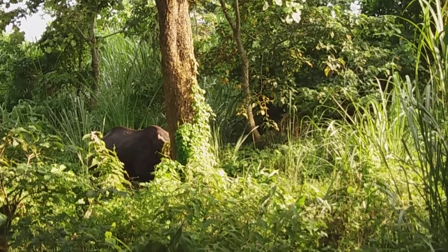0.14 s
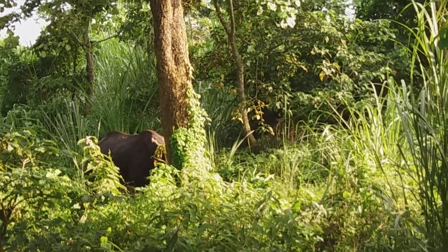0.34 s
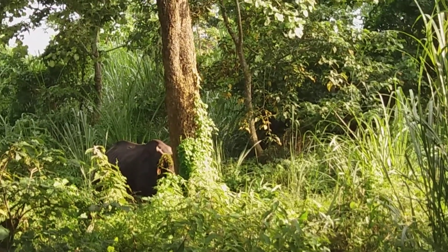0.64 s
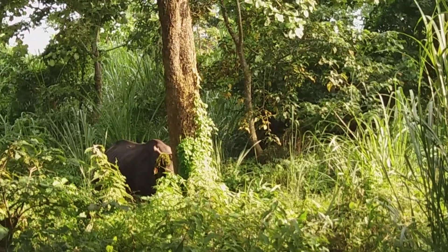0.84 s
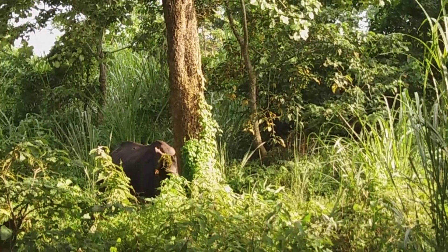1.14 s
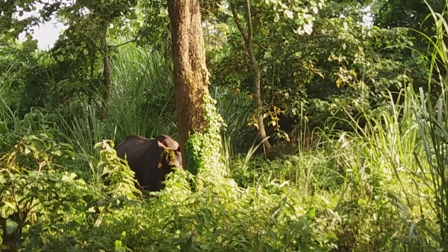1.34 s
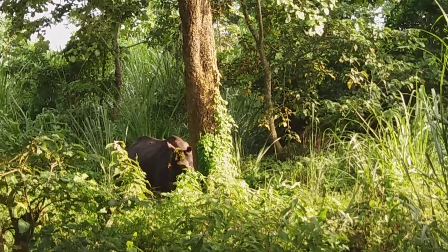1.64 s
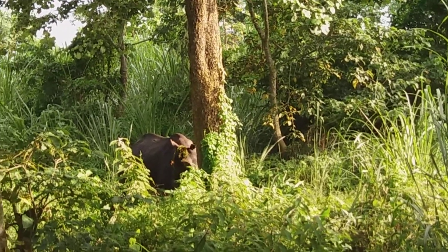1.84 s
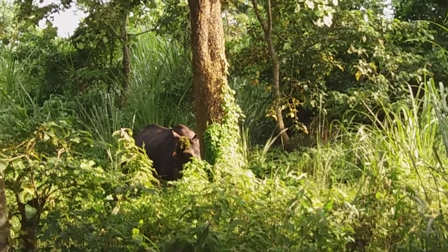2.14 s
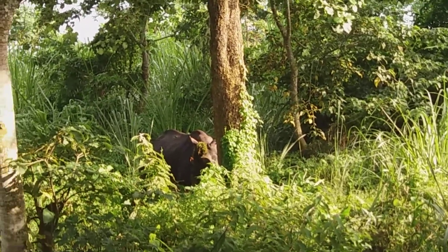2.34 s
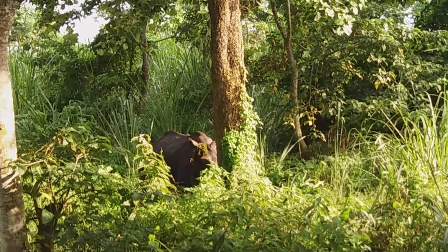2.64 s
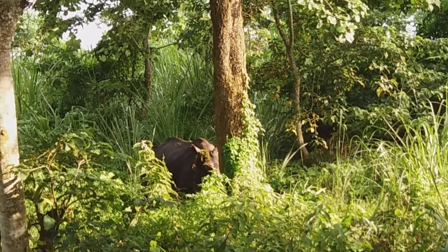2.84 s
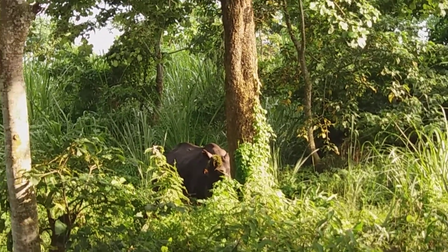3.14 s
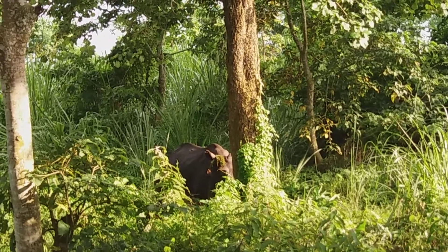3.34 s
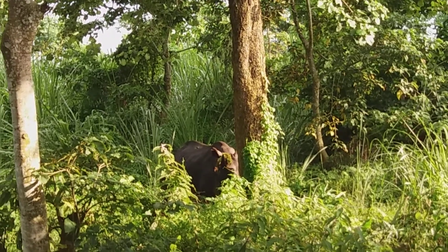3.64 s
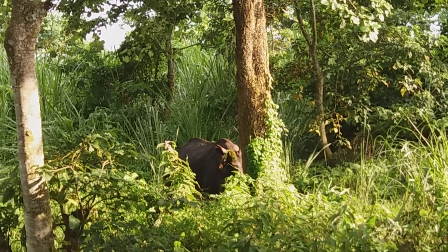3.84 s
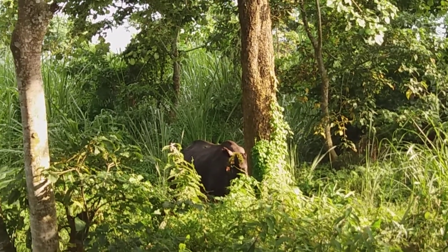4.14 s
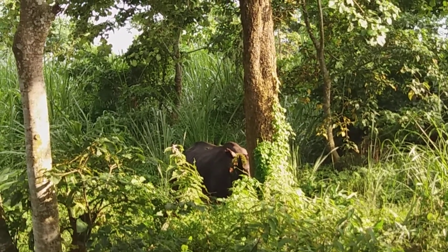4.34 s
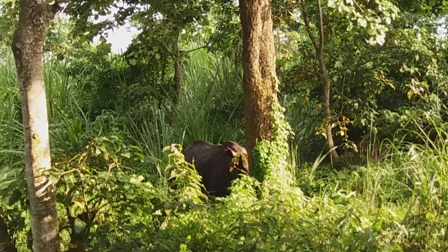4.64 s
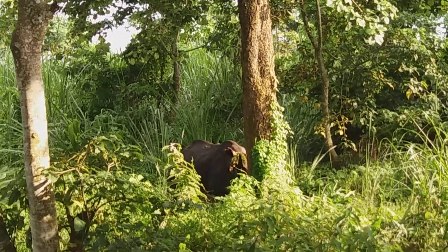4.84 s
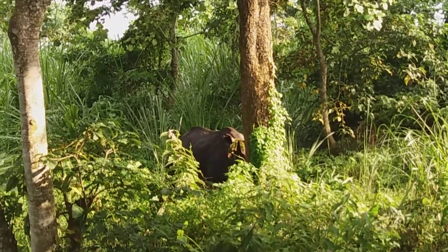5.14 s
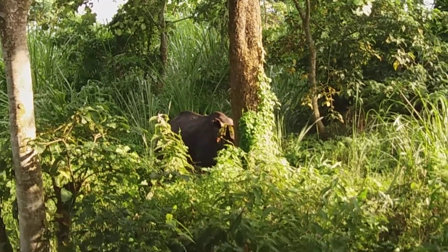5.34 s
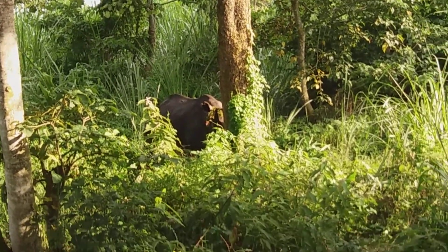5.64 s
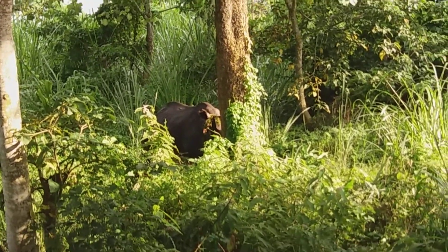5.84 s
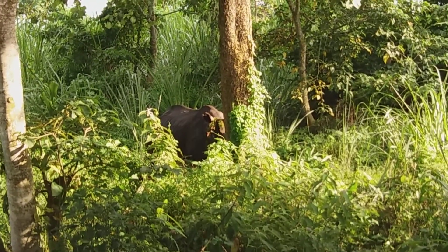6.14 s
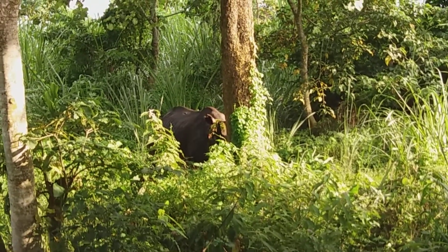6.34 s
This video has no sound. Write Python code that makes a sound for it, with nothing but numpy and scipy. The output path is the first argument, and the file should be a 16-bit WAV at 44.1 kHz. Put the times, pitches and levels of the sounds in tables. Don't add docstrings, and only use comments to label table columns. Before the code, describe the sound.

Dense woodland bird chatter with echoing whoops in threes, steady high insect shimmer, faint leaf hiss and a few dull knocks on the camera.

```python
import sys
import numpy as np
from scipy import signal
from scipy.fft import rfft, irfft
from scipy.io import wavfile
from scipy.ndimage import uniform_filter1d

SR = 44100
rng = np.random.default_rng(int(sys.argv[2]) if len(sys.argv) > 2 else 0)


def master(y):
    cut = np.clip(np.atleast_2d(y).T, -1, 1)
    pcm = np.round(cut * 32767)
    wavfile.write(sys.argv[1], SR, pcm.astype(np.int16))


def attenuation_scalar(level_db):
    decades = np.asarray(level_db, float) / 20
    return 10 ** decades


N = 286209
TIME = np.arange(N) / SR


def unit(x):
    return x / np.sqrt(np.mean(x ** 2) + 1e-30)


def walk(rate, count=N):
    hold = max(int(SR / rate), 1)
    steps = np.repeat(rng.standard_normal(count // hold + 1), hold)[:count]
    return unit(uniform_filter1d(steps, hold))


def curve(points):
    return np.interp(TIME, *np.transpose(points))


def colour(x, shape):
    hz, db = np.transpose(shape)
    f = np.maximum(np.fft.rfftfreq(len(x), 1 / SR), 1)
    gain = attenuation_scalar(np.interp(np.log(f), np.log(hz), db, -200, -200))
    return unit(irfft(rfft(x) * gain, len(x)))


def ring(x, hz, width):
    b, a = signal.iirpeak(hz, hz / width, fs=SR)
    return signal.lfilter(b, a, signal.lfilter(b, a, x))


def clicks(rate, count, jitter, scatter_db):
    chance = rng.standard_normal((int(count * rate / SR * 2) + 4, 2))
    gaps = np.clip(1 + jitter * chance[:, 0], .5, 2) * SR / rate
    at = np.cumsum(gaps).astype(int) - int(SR / rate / 2)
    inside = (at < count) & (at >= 0)
    out = np.zeros(count)
    out[at[inside]] = attenuation_scalar(scatter_db * chance[inside, 1])
    return out


def add(out, s, x):
    i = max(int(s * SR), 0)
    out[i:i + len(x)] += x[:max(N - i, 0)]


def sing(notes, swell, rough, wobble, flutter=150., late=1, sharp=0.27):
    out = np.zeros(N)
    for s, length, a, b, c, db in notes:
        u = np.linspace(0, 1, int(length * SR))
        v = u ** late
        hz = a * (1 - v) * (1 - 2 * v) + 4 * b * v * (1 - v) + c * v * (2 * v - 1)
        hz = hz + np.minimum(hz, 3000) * wobble * walk(flutter, len(u))
        shape = np.sin(np.pi * u ** swell) ** sharp * (1 + rough * walk(flutter, len(u)))
        add(out, s, attenuation_scalar(db) * shape * np.sin(2 * np.pi * np.cumsum(hz) / SR))
    return out


def glides(rows, half):
    return [(s, length, a, a + half * (c - a), c, db) for s, length, a, c, db in rows]


def level(rows):
    return [(s, length, hz, hz, hz, db) for s, length, hz, db in rows]


def burst(length, hz, width, rate, db, edge=0.14):
    count = int(length * SR)
    pulses = clicks(rate, count, .2, 2.2) + 0.04 * rng.standard_normal(count)
    breath = signal.windows.tukey(count, min(edge, 1)) * pulses
    return attenuation_scalar(db) * unit(ring(np.pad(breath, (0, 400)), hz, width))


# pitch in Hz, level in dB.
AIR_SPECTRUM = [(20, -28), (45, 4), (109, -0.5), (474, -13.5), (594, -11.5), (658, -11), (841, -16.5),
                (1590, -13), (2540, -8.5), (3050, -11), (4410, -16.5), (5640, -19), (6000, -29),
                (7800, -31), (13200, -120)]
# pitch in Hz, level in dB.
HISS_SPECTRUM = [(4880, -16), (8300, -30), (8520, -4.5), (9220, 0), (9870, -3.5), (10800, 5), (11200, 0),
                 (11900, -10.5), (13700, -7), (15500, -5.5)]
# time in seconds, level change in dB.
BREEZE_LEVEL = [(0, 0), (3, .5), (4.2, .5), (5.5, -.5), (6.05, -.5), (6.25, -2.5), (6.49, -1)]


def air():
    low = colour(rng.standard_normal(N), AIR_SPECTRUM)
    wind = ring(low, 58, 89)
    low = low + wind * (attenuation_scalar(2.6 * walk(24)) - 1)
    hiss = colour(rng.standard_normal(N), HISS_SPECTRUM)
    low_db = -56 + curve(BREEZE_LEVEL) + 0.49 * walk(5.4)
    return attenuation_scalar(low_db) * low + attenuation_scalar(-63 + 0.19 * walk(5.2)) * hiss


# start in seconds, gap in seconds, rise in dB.
THROB_BOUTS = [(.058, 0.098, 3.5), (.69, 0.11, 2.5), (1.269, .085, 2.5), (1.845, 0.095, 4),
               (2.451, 0.096, 3.5), (3.128, 0.0974, 4.5), (3.742, 0.1, 3.5), (4.345, 0.086, 2.5),
               (5.151, .1, 3), (5.645, 0.088, 4.5), (6.185, .096, 3)]
THROBS_PER_BOUT = [4, 4, 5, 4, 4, 4, 4, 5, 4, 5, 4]
# time in seconds, rise in dB.
STRAY_THROBS = [(2.385, 2.5), (2.855, 0), (2.935, 1.5), (3.048, 2.5), (3.57, 3), (3.64, 2), (4.22, 2),
                (5.8, 2)]


def throbs():
    rows = []
    for (s, gap, db), count in zip(THROB_BOUTS, THROBS_PER_BOUT):
        rows.append(np.linspace((s, db), (s + gap * (count - 1), db), count))
    return np.vstack(rows + [STRAY_THROBS])


# time in seconds, level in dB.
CICADA_LEVEL = [(0, -51.5), (1.0, -48.5), (1.15, -52.5), (1.5, -49), (1.75, -51), (2.6, -50), (4.2, -50),
                (4.6, -47.5), (4.8, -51.5), (5.3, -48), (5.56, -52.5), (6.49, -50.5)]
# pitch in Hz, level in dB.
CICADA_SPECTRUM = [(3290, -73), (5600, -24.5), (5860, -15.5), (6720, 1.5), (7100, 5.5), (7750, 1),
                   (8370, -16.5), (8700, -16), (11300, -47), (19100, -120)]


def cicadas():
    ticks = sum(clicks(rate, N, 0.1, 5.5) for rate in (205.5, 216.6, 218.0, 275, 284.0, 337))
    gate = unit(uniform_filter1d(ticks, 60)) + 2.0
    song = colour(gate * rng.standard_normal(N), CICADA_SPECTRUM)
    rise = -0.02 + 0.4 * walk(12)
    for s, rise_db in throbs():
        add(rise, s - .045, rise_db * np.hanning(int(.09 * SR)))
    near = ring(song, 6920.0, 1600) * (attenuation_scalar(1.51 * rise + 1.3 * walk(35)) - 1)
    high = ring(song, 7725, 690) * (attenuation_scalar(1.66 * rise + 2.0 * walk(22)) - 1)
    overtone = unit(ring(gate * rng.standard_normal(N), 13300, 2000))
    overtone = attenuation_scalar(-25 + 1.5 * rise + 1.0 * walk(35)) * overtone
    return attenuation_scalar(curve(CICADA_LEVEL)) * (song + near + high + overtone)


# pitch in Hz, width in Hz, level in dB, start in seconds, stop in seconds.
CRICKET_LINES = [
    (4590, 110, -71, 3.3, 6.0),
    (9040, 93, -76.5, -1.5, 7),
    (9400, 200, -76.5, -0.5, 7),
]
# start in seconds, level in dB.
CRICKET_PHRASES = [(.32, -67), (.64, -65), (.85, -68), (1.07, -71), (1.3, -67), (1.72, -71), (1.93, -71),
                   (2.12, -66), (2.31, -61.5), (2.55, -60), (2.8, -64), (3.06, -61.5), (3.31, -61.5),
                   (3.58, -62), (3.83, -61), (4.11, -64), (4.36, -64), (5.35, -64.5), (5.6, -64.5),
                   (5.83, -67)]


def crickets():
    out = np.zeros(N)
    for hz, width, db, start, stop in CRICKET_LINES:
        line = unit(ring(rng.standard_normal(N), hz, width))
        out += attenuation_scalar(db + 1.5 * walk(12)) * line * (TIME > start) * (TIME < stop)
    for s, db in CRICKET_PHRASES:
        hz = 10810 - 199 * (s < 1.6)
        note = (0.002, .19, hz, hz * 1.016, hz * 1.022, db + 4.5)
        phrase = sing([note], swell=0.97, rough=0.11, wobble=0.0253, flutter=600.0)[:SR // 5]
        add(out, s, phrase * np.cos(np.pi * 112 * TIME[:SR // 5]) ** 2)
    return out


# time in seconds, level in dB, middle pitch in Hz.
FAR_BIRDS = [(0.0, -55.5, 2840), (0.43, -54, 2450), (0.74, -67, 2494), (0.89, -71.5, 3005),
             (2.19, -57, 2475), (2.35, -60, 2316), (3.03, -54.5, 2628), (4.03, -68, 2365),
             (4.28, -59.5, 2412), (4.75, -66, 2500), (5.4, -63.5, 2602), (5.9, -78, 2500),
             (6.49, -77, 2410)]


def chorus():
    s, db, hz = np.transpose(FAR_BIRDS)
    chance = rng.standard_normal((800, 4))
    start = rng.uniform(0, N / SR, len(chance))
    pitch = np.interp(start, s, hz) * np.exp(0.1115 * np.clip(chance[:, 0], -2, 2))
    bend = np.exp(0.061 * chance[:, 1])
    length = .02 * np.exp(.3 * chance[:, 2])
    note_db = np.interp(start, s, db) - 3.5 + 2.3 * chance[:, 3]
    notes = zip(start, length, pitch / bend, pitch, pitch * bend, note_db)
    return sing(notes, swell=.8, rough=.4, wobble=.015)


# start in seconds, length in seconds, start, middle and end pitch in Hz, peak in dB.
DOVE_COOS = [(0, .33, 600, 570, 540, -65), (.56, .6, 560, 700, 670, -59), (1.16, .34, 680, 680, 740, -63),
             (3.2, .34, 640, 700, 740, -62), (1.15, .27, 583, 535, 510, -63),
             (1.92, .5, 670, 750, 715, -63), (2.6, .61, 662, 645, 620, -65.5),
             (4.3, .95, 720, 680, 640, -65), (5.68, .8, 745, 690, 625, -64)]


def dove():
    return attenuation_scalar(-2.5) * sing(DOVE_COOS, swell=.7, rough=.45, wobble=.03, flutter=55.)


# start in seconds, length in seconds, centre in Hz, width in Hz, level in dB.
HARSH_RASPS = [(.92, 0.072, 3000, 600, -63), (1.8, .08, 12500, 7000, -67), (3.027, 0.13, 2630, 700, -56),
               (0, 0.062, 990, 253, -61), (0, .04, 2850, 800, -58), (4.19, .06, 3250, 900, -59),
               (.2, .15, 2950, 800, -58), (.47, .06, 2250, 600, -58), (2.7, .08, 3450, 500, -62),
               (3.75, .2, 3100, 1200, -62), (5.7, .28, 3300, 900, -66), (1.279, 0.082, 3000, 810, -56),
               (1.791, 0.083, 2440, 2800, -53.5), (1.976, 0.047, 3460, 2000, -56.5),
               (3.29, 0.024, 2500, 700, -57), (4.086, 0.056, 2660, 600, -55.5),
               (4.168, 0.075, 3200, 1000, -54), (3.72, .06, 2650, 700, -58), (4.479, 0.025, 2200, 800, -58)]
# start in seconds, length in seconds, level in dB.
BUZZ_RUN = [(2.147, 0.065, -65), (2.53, .09, -64), (2.724, .08, -60), (2.918, 0.13, -61), (3.105, .14, -61),
            (3.305, .145, -60), (3.493, .12, -69)]
# start in seconds, length in seconds, pitch in Hz, level in dB.
SLOW_TRILLS = [(4.665, 0.075, 2550, -58), (5.315, 0.086, 2630, -55.5)]


def rasps():
    out = np.zeros(N)
    harsh = [(s, length, hz, width, 320, db) for s, length, hz, width, db in HARSH_RASPS]
    harsh += [(s, length, 4270, 300, 260, db) for s, length, db in BUZZ_RUN]
    harsh += [(s, length, hz, 680, 57, db) for s, length, hz, db in SLOW_TRILLS]
    for s, *voice in harsh:
        add(out, s, burst(*voice, edge=0.36))
    return out


# start in seconds, length in seconds, start and end pitch in Hz, peak in dB.
UPWARD_FLICKS = [
    (.322, .04, 1700, 2130, -46),
    (.022, .028, 3450, 4100, -56.5),
]
RISING_CHIRPS = [(1.125, .018, 3850, 4300, -60), (2.04, .05, 2100, 2660, -52),
                 (.15, 0.058, 2560, 3094, -43), (.17, 0.03, 2900, 3010, -45.5),
                 (.17, 0.046, 2310, 2740, -56), (.395, .03, 2450, 2700, -52),
                 (.418, .032, 2650, 2790, -40.5), (.9, .085, 2950, 3480, -56),
                 (.487, 0.036, 2435, 2770, -48), (1.24, .04, 3930, 4040, -55),
                 (2.26, 0.021, 2390, 2550, -58), (4.235, .035, 2440, 2800, -56.5),
                 (.94, 0.036, 2980, 3180, -45.5), (1.02, 0.033, 3490, 3880, -59),
                 (1.2, .04, 3170, 3410, -58), (1.225, .03, 3350, 3750, -58),
                 (1.444, 0.076, 1944, 2167, -54), (2.008, 0.05, 1874, 2100, -52.5),
                 (2.7, 0.059, 3370, 3590, -59), (3.34, 0.04, 2585, 2900, -60), (3.512, .1, 4000, 3880, -61),
                 (3.652, 0.026, 2255, 2706, -49.5), (4.855, 0.024, 2250, 2460, -53.5),
                 (5.66, 0.079, 2520, 2716, -55.5), (6.426, .02, 2850, 3700, -50)]
FALLING_CHIRPS = [(1.288, 0.015, 3000, 2750, -53), (1.3, .025, 2400, 2350, -55),
                  (3.03, 0.034, 3190, 2500, -51), (.387, .018, 4100, 3600, -55),
                  (.53, .025, 3950, 3500, -61), (.365, .03, 2050, 1800, -53),
                  (.534, 0.045, 2700, 2340, -51), (.571, 0.058, 2760, 2500, -49),
                  (2.295, .04, 2750, 2300, -52), (1.19, 0.043, 2680, 2585, -54),
                  (1.507, 0.053, 2330, 2160, -51), (1.598, 0.058, 3030, 2960, -47),
                  (1.689, 0.044, 3020, 2920, -54), (3.075, .034, 2650, 2500, -47),
                  (3.05, .06, 2900, 2650, -51), (.3, .045, 3300, 3150, -57),
                  (3.15, 0.049, 1850, 1700, -53.5), (4.19, .03, 3600, 3100, -53),
                  (4.69, .03, 3000, 2750, -53), (3.905, .036, 2200, 2220, -48),
                  (4.096, 0.044, 2240, 2183, -48.5), (5.1, .05, 2350, 2150, -59),
                  (4.285, 0.054, 2400, 2110, -51), (5.505, 0.042, 2850, 2700, -62),
                  (5.85, 0.037, 3650, 3250, -56.5)]
HOOKED_SWOOPS = [
    (3.716, .053, 3100, 2230, -49.5),
    (4.166, .072, 3750, 2430, -48.5),
    (4.18, .05, 3650, 2900, -55),
]


def chirps():
    notes = glides(RISING_CHIRPS, 0.565) + glides(FALLING_CHIRPS, 0.583) + glides(HOOKED_SWOOPS, .81)
    out = sing(notes, swell=.8, rough=.22, wobble=.012, flutter=260.)
    return out + sing(glides(UPWARD_FLICKS, .81), swell=.8, rough=.2, wobble=.008, late=.6)


# start in seconds, length in seconds, pitch in Hz, peak in dB. # Level
LEVEL_WHISTLES = [(.092, 0.07, 2710, -49.5), (.105, 0.063, 2940, -52), (.935, 0.061, 2830, -57),
                  (1.655, 0.057, 2680, -51), (1.712, 0.032, 2620, -46.5), (1.757, .015, 2664, -50),
                  (5.205, .035, 2494, -57), (5.31, .04, 2520, -55), (.828, 0.036, 2940, -50.5),
                  (1.13, 0.027, 2166, -53.5), (2.15, .075, 2430, -53.5), (2.21, 0.033, 1940, -54),
                  (2.305, 0.069, 2144, -51.5), (2.63, 0.054, 2690, -58), (2.665, 0.042, 2170, -52),
                  (2.76, 0.033, 2400, -54), (2.83, .09, 2136, -60), (2.86, .05, 2650, -57),
                  (3.36, 0.08, 2900, -60), (4.02, 0.041, 2570, -65), (4.49, .085, 2600, -58),
                  (2.574, 0.049, 1724, -56), (3.021, 0.1, 2673, -50), (3.073, 0.041, 1880, -55.5),
                  (3.13, 0.03, 2710, -47), (4.716, 0.0094, 1650, -54), (5.093, 0.052, 2860, -51.5),
                  (5.15, 0.073, 2860, -58), (5.1, 0.03, 1470, -62), (5.11, 0.026, 2230, -54),
                  (5.146, 0.062, 2537, -47.5), (6.478, .012, 2100, -55),
                  (1.04, .025, 3120, -47.5), (1.02, 0.017, 3100, -56), (1.172, .02, 3500, -58),
               (1.3, .012, 2000, -58), (1.272, .015, 2570, -59), (1.6, 0.012, 3500, -60),
               (1.8, .02, 2100, -58), (2.55, .03, 2650, -52), (3.287, .02, 2300, -51),
               (3.49, 0.023, 2150, -55), (3.4, 0.013, 2400, -49), (3.755, .015, 2750, -50.5),
               (4.483, 0.013, 2270, -52), (4.672, 0.011, 2250, -52), (4.705, .018, 2750, -51),
               (4.7, .02, 2600, -56), (4.73, .02, 2300, -57), (5.275, 0.014, 2720, -52),
               (5.35, .015, 2700, -52), (6, .11, 2620, -64), (5.33, 0.035, 3080, -57),
               (5.875, 0.021, 2520, -64), (6.445, .025, 2640, -59), (6.28, 0.034, 1970, -62)]
THIN_WHISTLES = [(.99, 0.031, 4260, -64), (.5, .03, 3960, -62), (4.87, 0.028, 3870, -61),
                 (.55, .022, 3330, -54), (.578, .018, 3330, -57), (.615, .018, 3320, -59),
                 (.665, .025, 3300, -60), (5.12, .05, 3680, -64), (5.25, .06, 3720, -65),
                 (2.39, 0.037, 3110, -59), (4.28, 0.1, 3920, -60), (6.35, 0.065, 3820, -74),
                 (1.29, .17, 3970, -62), (1.522, .07, 3810, -57.5), (2.342, .11, 3780, -58),
                 (2.585, .05, 3350, -62), (2.72, .14, 8420, -57.5), (2.91, 0.14, 8140, -57),
                 (3.714, .12, 3840, -61), (3.86, .03, 3800, -60), (4.503, .02, 3875, -58),
                 (4.685, 0.027, 3870, -56), (5.75, .065, 3140, -61), (5.827, 0.021, 3850, -55)]


def whistles():
    out = sing(level(LEVEL_WHISTLES), swell=.7, rough=.3, wobble=.012, flutter=240.)
    return out + sing(level(THIN_WHISTLES), swell=.8, rough=.4, wobble=.011, flutter=200.)


# start in seconds, length in seconds, beak pitch in Hz, throat and beak level in dB.
BEAK_CLUCKS = [(0.611, 0.032, 1226, -63, -55), (0.775, 0.033, 1370, -62, -52.5),
               (0.837, 0.027, 1334, -59.5, -49.5), (0.986, 0.025, 1190, -54.5, -56),
               (2.689, .04, 1170, -62.5, -62), (2.832, 0.048, 1270, -63, -56.5),
               (2.9, .051, 1270, -70, -54), (3.092, .035, 1180, -60, -61)]
# start in seconds, throat pitch in Hz, throat and beak level in dB.
LOW_RATTLE = [(1.04, 700, -57, -59.5), (1.135, 692, -56, -59), (1.186, 644, -54.5, -62),
              (1.25, 720, -57.5, -58.5), (1.33, 644, -56.5, -59), (1.406, 760, -54, -66),
              (2.599, 695, -63.5, -67), (3.166, 674, -58.5, -59), (3.232, 720, -56, -66),
              (3.299, 720, -56.5, -64), (3.37, 714, -56.5, -63), (3.445, 734, -54.5, -72)]


def clucks():
    out = np.zeros(N)
    calls = [(s, length, 944, hz, *db) for s, length, hz, *db in BEAK_CLUCKS]
    calls += [(s, 0.0292, hz, 923, *db) for s, hz, *db in LOW_RATTLE]
    for s, length, throat_hz, beak_hz, throat_db, beak_db in calls:
        throat = burst(length, throat_hz, 220, 230.9, throat_db)
        beak = burst(length, beak_hz, 190, 230, beak_db)
        add(out, s, throat + beak)
    return out


def whoop(shape, db):
    s, hz, effort_db = np.transpose(shape)
    t = TIME[:int(s[-1] * SR)]
    hz = uniform_filter1d(np.interp(t, s, hz), 200) * (1 + .012 * walk(240., len(t)))
    loudness = attenuation_scalar(db + np.interp(t, s, effort_db) + 1.95 * walk(199.0, len(t)))
    return loudness * np.sin(2 * np.pi * np.cumsum(hz) / SR)


# start in seconds, whoop peak in dB, squeak level in dB.
WHOOP_CALLS = [(1.497, -37.5, -46), (1.779, -39, -44), (2.19, -39, -45), (3.525, -37.5, -46.5),
               (3.8, -38.5, -46), (4.194, -41, -48.5)]
# time after its start in seconds, pitch in Hz, level in dB from the peak.
WHOOP_BENDS = [
    [(0, 660, -12), (.008, 721, -12), (.044, 878, -14.5), (.055, 903, 1.5), (.063, 915, -11.5),
     (.074, 910, -24)],
    [(0, 610, -18), (.01, 689, -13), (.035, 964, -8.5), (.047, 1045, -4), (.058, 1020, -1), (.069, 870, -3),
     (.08, 760, -14)],
    [(0, 697, -18), (.012, 868, -6.5), (.021, 958, 0), (.042, 954, -5), (.049, 890, -24)],
]
# delay in seconds, length in seconds.
SQUEAK_TIMES = [(.058, 0.0347), (.067, 0.0326), (.04, 0.0291)]
SQUEAK_PITCH = (1315, 1140, 940)
# delay and length in seconds, start, middle and end pitch in Hz,
# level in dB from the whoop.
SECOND_VOICE = (.022, .038, 1200, 1310, 1400, -20)


def whoops():
    squeaks = []
    for (s, _, db), (after, length) in zip(WHOOP_CALLS, 2 * SQUEAK_TIMES):
        squeaks.append((s + after, length, *SQUEAK_PITCH, db))
    out = sing(squeaks, swell=.9, rough=.45, wobble=.02, flutter=240., late=1.1, sharp=.5)
    for s, length, _, middle_hz, _, db in squeaks:
        add(out, s, burst(length, middle_hz, 410, 230, db - 8.0, edge=0.38))
    for (s, db, _), shape in zip(WHOOP_CALLS, 2 * WHOOP_BENDS):
        add(out, s, whoop(shape, db))
        add(out, s, burst(shape[-1][0], 850, 730, 230, db - 17.0, edge=0.76))
    after, *upper, under_db = SECOND_VOICE
    second = [(s + after, *upper, db + under_db) for s, db, _ in WHOOP_CALLS[::3]]
    return out + sing(second, swell=1, rough=.4, wobble=.015)


# start in seconds, peak in dB, body pitch in Hz, tick level in dB.
CAMERA_KNOCKS = [
    (1.185, -44.5, 112, -70),
    (2.598, -48, 105, -74),
    (4.199, -47.5, 103, -73),
    (4.464, -44.5, 88.8, -71),
    (4.993, -43, 87, -60.5),
    (5.268, -51, 61.4, -91),
    (6.257, -64, 115, -91),
]


def knocks():
    out, t = np.zeros(N), TIME[:SR // 10]
    for s, db, hz, tick_db in CAMERA_KNOCKS:
        turn = 2 * np.pi * hz * (t + 0.01 * (1 - np.exp(-t / 0.0016)))
        body = np.sin(turn) * np.exp(-(t / 0.021) ** 2) * (1 - np.exp(-t / 0.0013))
        tick = np.sin(2 * np.pi * 1100 * (t - .004)) * np.exp(-((t - .004) / 0.00059) ** 2)
        add(out, s, -attenuation_scalar(tick_db + 24.0) * tick)
        add(out, s + 0.00437, attenuation_scalar(db + 0.5) * body)
    return out


def echoes(x):
    t = TIME[:SR]
    near_t60_s, far_t60_s = 0.36, 1.86
    near = rng.standard_normal(SR) * attenuation_scalar(3.9 * walk(197.6, SR) - 60 * t / near_t60_s) * (t > .004)
    far = rng.standard_normal(SR) * attenuation_scalar(1.96 * walk(29.7, SR) - 60 * t / far_t60_s)
    far = far * np.minimum(t / 0.037, 1)
    tail = (attenuation_scalar(2) * unit(near) + attenuation_scalar(-3) * unit(far)) / np.sqrt(SR)
    return signal.fftconvolve(x, tail)[:N]


def scene():
    far, coo = chorus(), dove()
    small = rasps() + chirps() + whistles()
    large = clucks() + whoops()
    shake = unit(1 + .6 * walk(400))
    wet = shake * (.36 * large + .55 * small) + .6 * coo + far
    birds = large + small + coo + .4 * far + echoes(wet)
    return (birds + cicadas() + crickets() + knocks() + air())[None]


def top_cut(x):
    return signal.sosfilt(signal.butter(12, 15690, fs=SR, output="sos"), x)


def record(dry):
    port = signal.butter(3, 70, "high", fs=SR, output="sos")
    return top_cut(signal.sosfilt(port, dry))


dry = scene()
out = record(dry)
master(out)
```